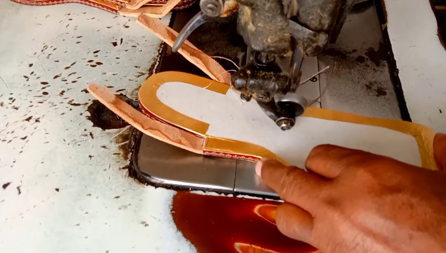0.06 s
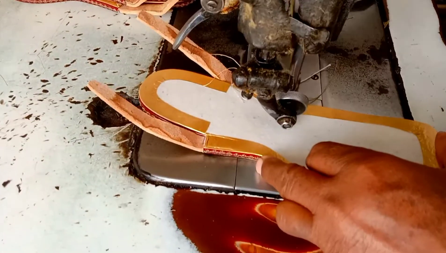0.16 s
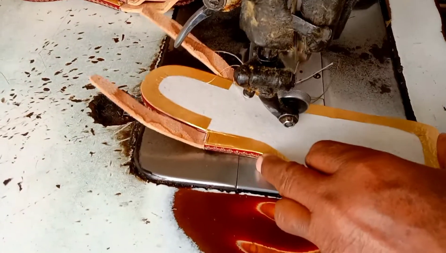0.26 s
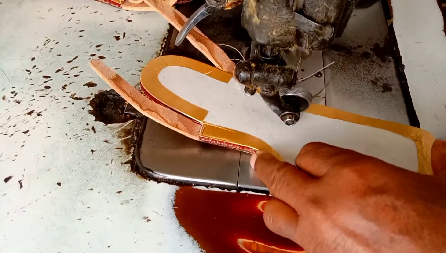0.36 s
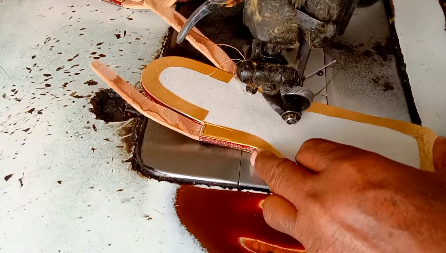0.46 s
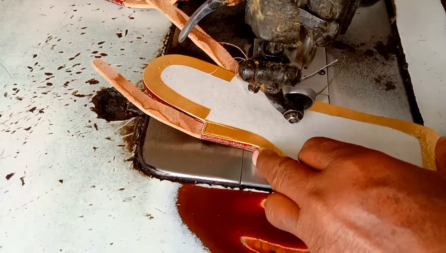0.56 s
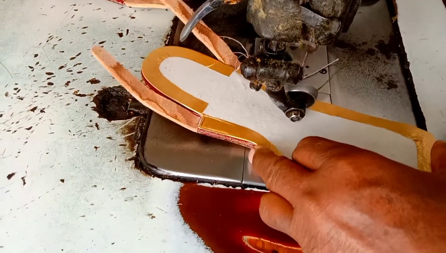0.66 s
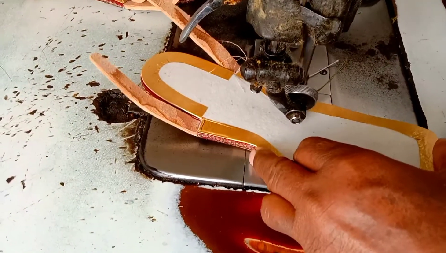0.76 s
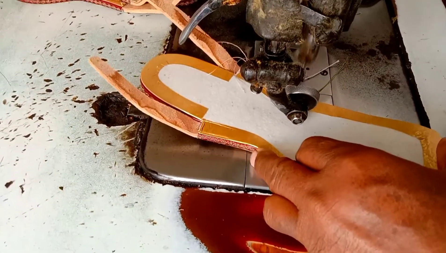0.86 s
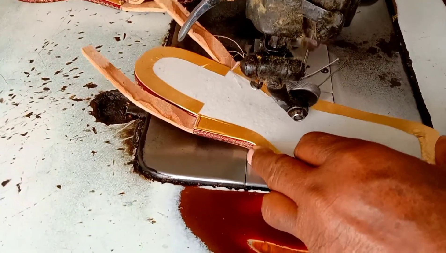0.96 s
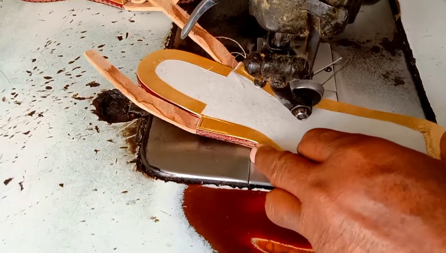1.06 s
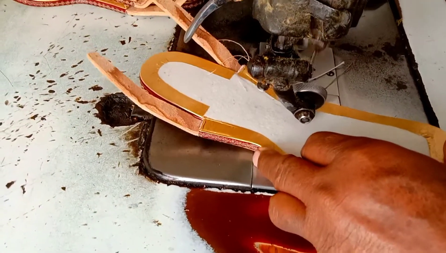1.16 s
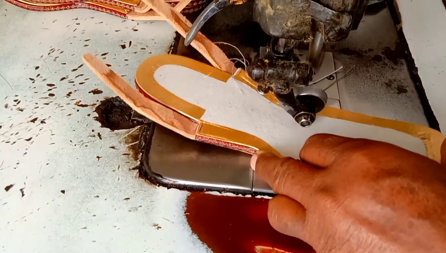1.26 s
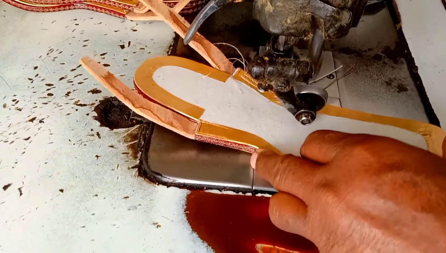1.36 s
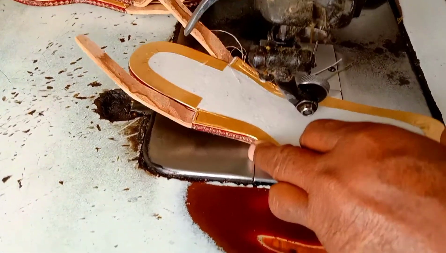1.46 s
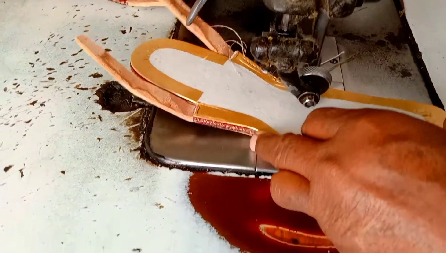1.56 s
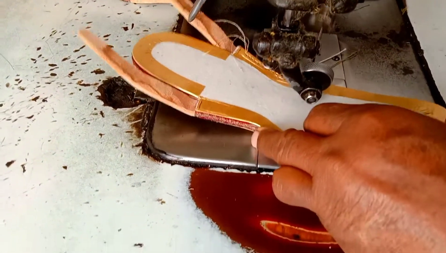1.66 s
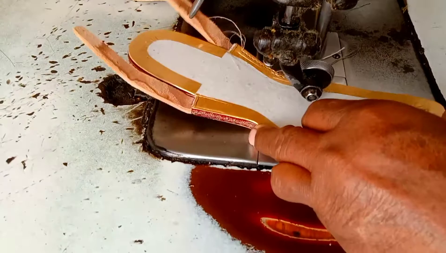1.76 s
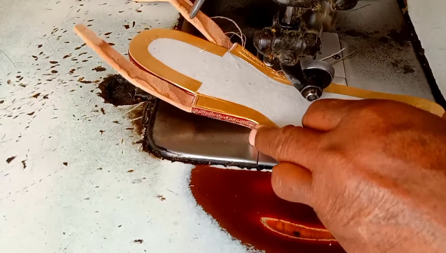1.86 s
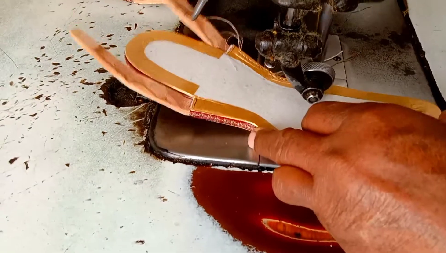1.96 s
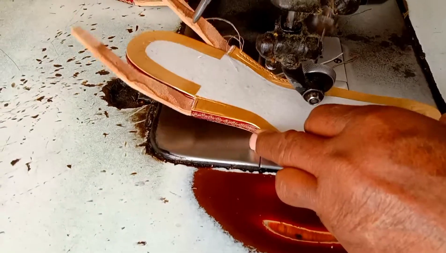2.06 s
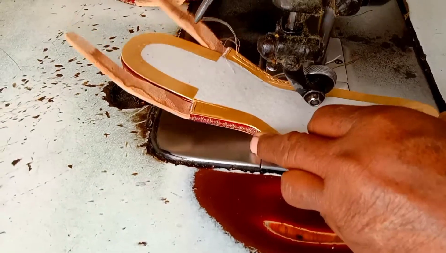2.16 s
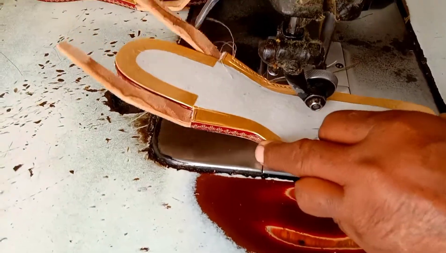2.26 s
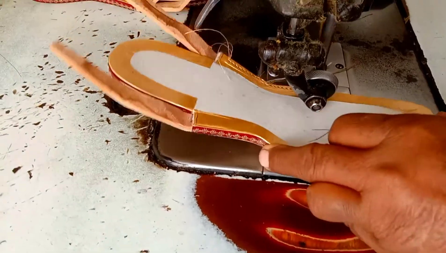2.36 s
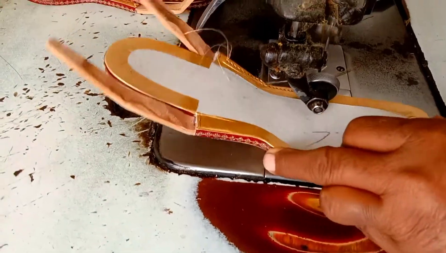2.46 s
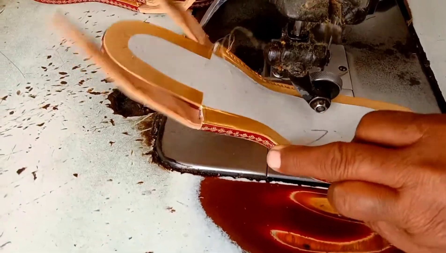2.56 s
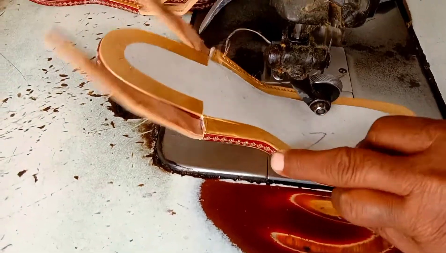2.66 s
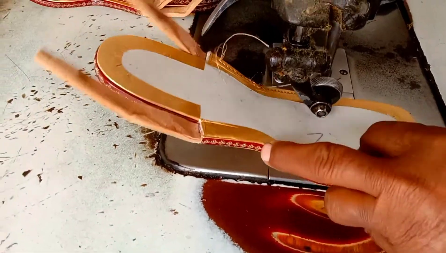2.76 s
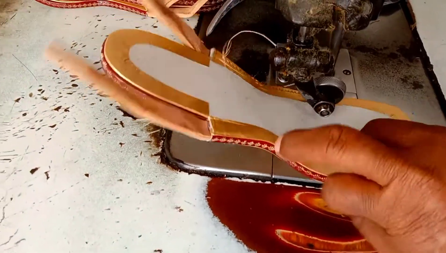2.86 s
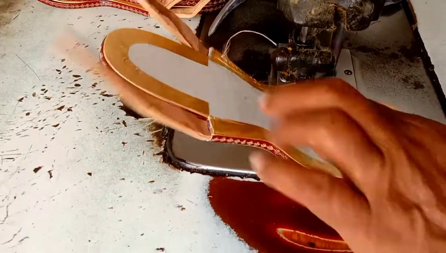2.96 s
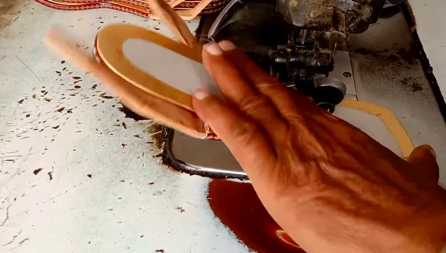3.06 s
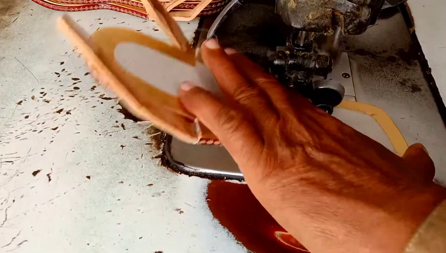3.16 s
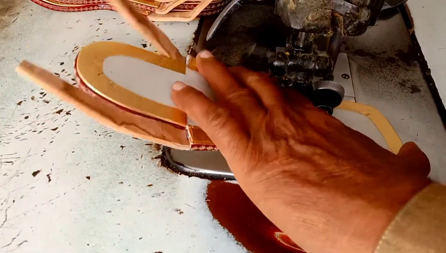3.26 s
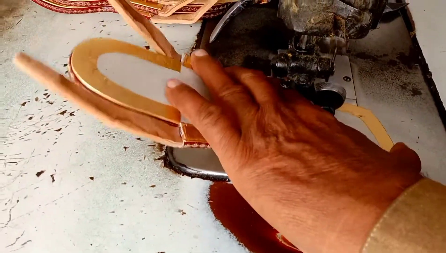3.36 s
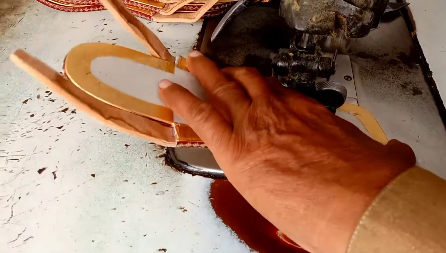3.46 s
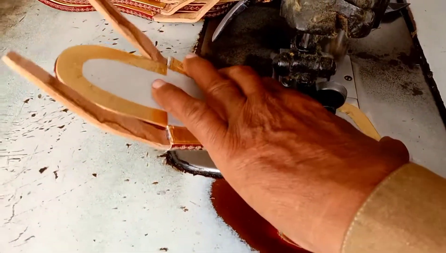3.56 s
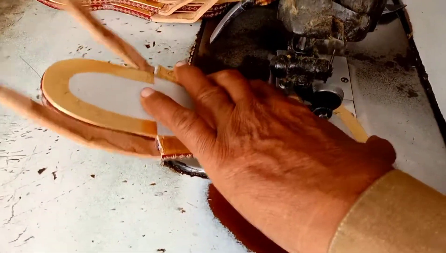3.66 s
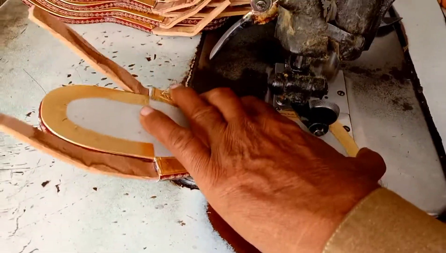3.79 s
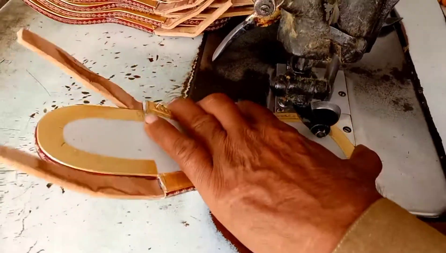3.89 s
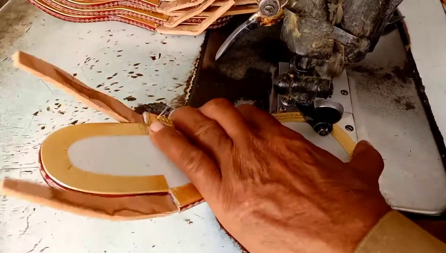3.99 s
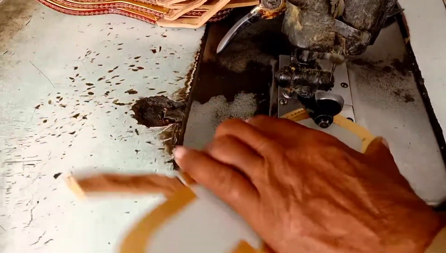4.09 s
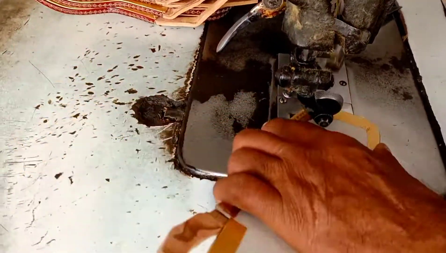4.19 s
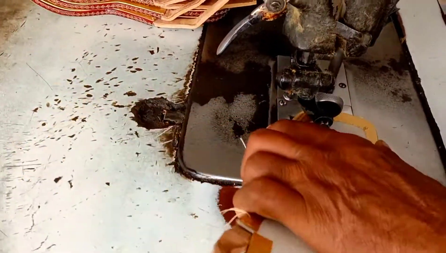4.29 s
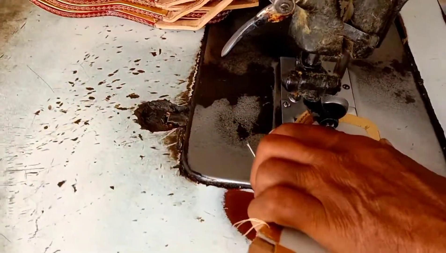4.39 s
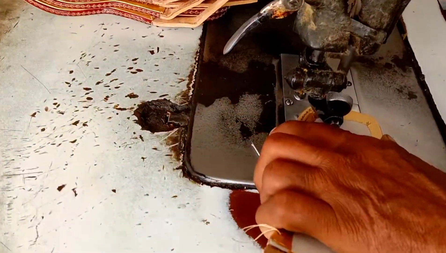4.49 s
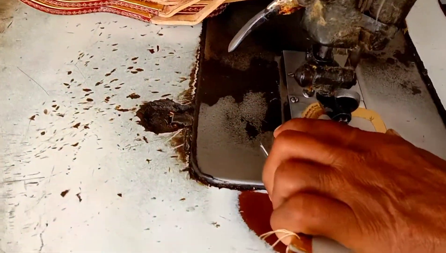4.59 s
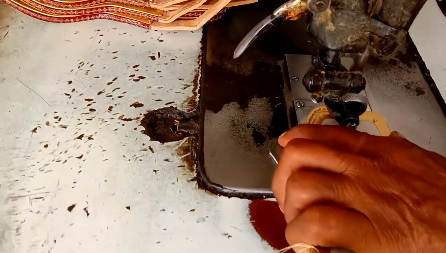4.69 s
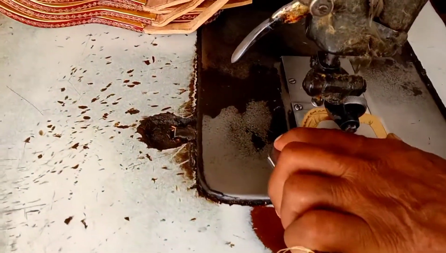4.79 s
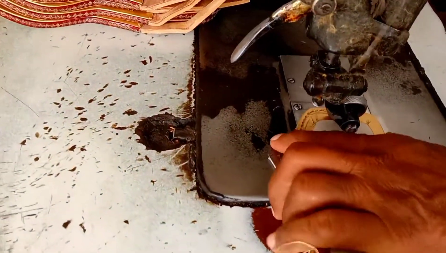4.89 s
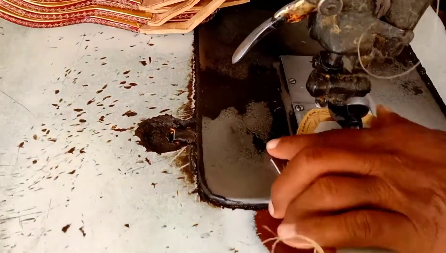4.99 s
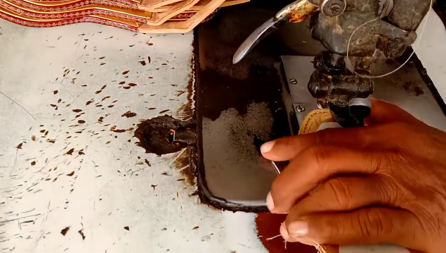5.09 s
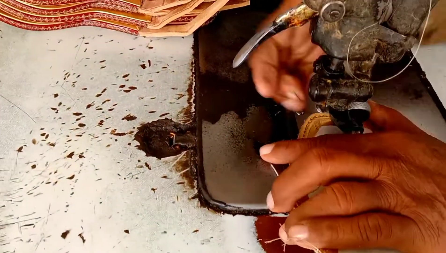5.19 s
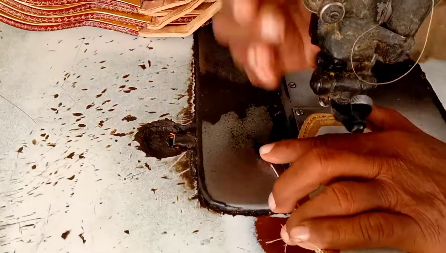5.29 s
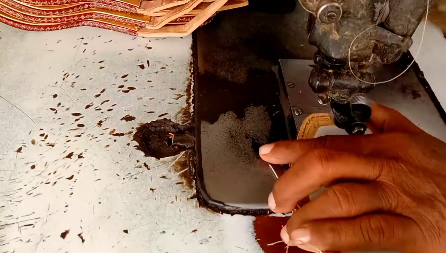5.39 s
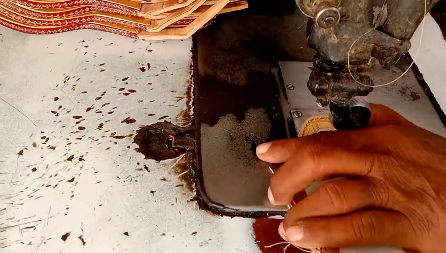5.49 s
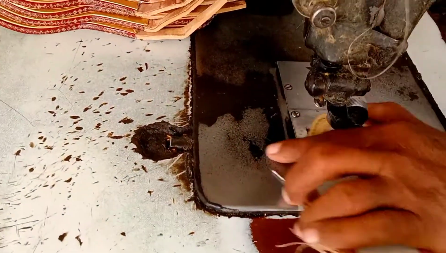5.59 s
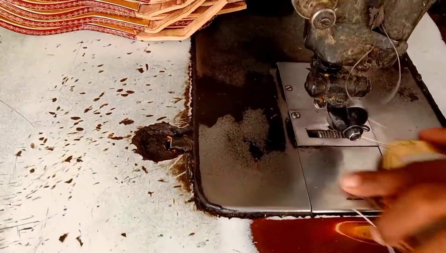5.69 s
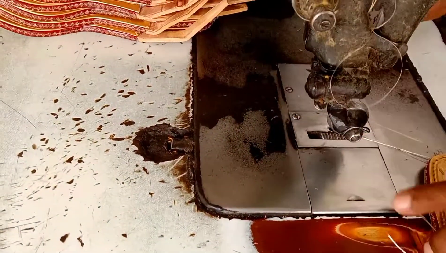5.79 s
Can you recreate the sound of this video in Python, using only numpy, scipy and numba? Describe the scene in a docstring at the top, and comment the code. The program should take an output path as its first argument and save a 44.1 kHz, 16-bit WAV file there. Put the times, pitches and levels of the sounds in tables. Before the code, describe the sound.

In a workshop, close to the microphone, an old sewing machine stitches leather. Heavy clanking strokes with low table thumps quicken, drop out for a blink, then become a fast bright rattle. It slows briefly, bursts again and stops; small metal snaps follow while the motor hums and whines.

```python
"""In a workshop, a hand's width from a phone, an old sewing machine stitches a leather sole.
Each stitch rattles the needle bar and shuttle and thumps the table; gears whirr between. It speeds up,
the sound drops out for a blink, it runs fast, then stops. The foot lever snaps three times, the sole is
dragged away, and the idling motor hums and whines on. Noisy contacts and clean pushes are
sent through band-pass filters that stand for the resonances of steel, casting and table."""
import sys
import numpy as np
from scipy import signal
from scipy.io import wavfile
from scipy.ndimage import uniform_filter1d
from numba import njit

SR = 44100
rng = np.random.default_rng(int(sys.argv[2]) if len(sys.argv) > 2 else 0)


def to_wav(sig):
    """Store sig (one row per channel, or 1-D mono) as 16-bit WAV at the path in sys.argv[1].

    Samples outside -1..1 are clipped; the rate is SR.
    """
    pcm = np.clip(np.atleast_2d(sig), -1, 1) * 32767
    pcm = np.round(pcm).astype(np.int16)
    wavfile.write(sys.argv[1], SR, pcm.T)  # frames by channels


N = 257544
TIME = np.arange(N) / SR  # seconds

# All levels in the tables are relative: each sound adds its own offset.
# Resonances of each part: (f/Hz, basic width/Hz, level/dB); filters widen the basic width.
# Small steel parts, from low to high
STEEL_MODES = [(2153, 740, -4), (2810, 490, -4.5), (3444, 190, -0.5), (5073, 540, 6), (5522, 500, 4.5),
               (5825, 1020, 2.5), (6420, 210, -9)]
# Iron casting of the machine: (f/Hz, basic width/Hz, level/dB)
CASTING_MODES = [(594, 560, 2.5), (826, 142, 3), (976, 160, 6), (1108, 230, 1.5), (1350, 353, 3.5),
                 (1630, 1500, -8.5)]
# Table under the machine: (f/Hz, basic width/Hz, level/dB)
TABLE_MODES = [(145.5, 33, -8.5), (182.7, 35.7, 0), (214.6, 36.8, 0), (295.3, 40.2, 3), (345.6, 96, -4.5),
               (420, 300, -15.5)]
# Deepest resonances of the table: (f/Hz, basic width/Hz, level/dB)
DEEP_MODES = [(75.5, 39, -17), (115.3, 32, 12.5)]
# Highest sizzle of the steel: (f/Hz, basic width/Hz, level/dB)
SIZZLE_MODES = [(10150, 910, 1), (11800, 7000, 24.5), (15000, 1800, 5)]
# Humming of the motor: (f/Hz, basic width/Hz, level/dB)
HUM_MODES = [(151, 67, -11.5), (289.3, 11.1, 7.5), (341.2, 15, 0.5), (586, 13.5, -15), (726, 117, -10.5),
             (1371, 87, -7), (1500, 420, -16.5)]
# Whining of the motor: (f/Hz, basic width/Hz, level/dB)
WHINE_MODES = [(5260, 110, -19), (6390, 170, 5.5), (10200, 610, -21.5)]

# Running gear between the blows: (t/s, gear chatter level/dB, frame shaking level/dB)
GEAR_LEVELS = [(0, -36, -32), (.2, -29, -35.5), (.95, -26.5, -29.5), (1.87, -26, -36), (2.2, -26, -34.5),
               (3.68, -21, -33), (4.1, -22, -24), (4.15, -29, -57), (4.19, -34, -38), (4.26, -29.5, -35),
               (4.5, -23.5, -29.5), (4.7, -19.5, -27.5), (4.87, -40, -38), (4.9, -45, -72)]
# Motor idling with the needle at rest: (t/s, hum level/dB, whine level/dB, hiss level/dB)
IDLE_LEVELS = [(4.871, -39, -52, -52), (4.95, -42, -64, -41.5), (5.07, -37, -40, -37),
               (5.15, -36, -33, -36), (5.33, -32, -30, -34), (5.6, -36, -32.5, -32.5),
               (5.69, -33.5, -20.5, -32), (5.84, -35.5, -36.5, -37)]
# One row per stitch, timed at the shuttle's rattle:
# (t/s, rattle level/dB, needle bar knock level/dB, table thump level/dB, thump delay/s)
STITCH_BLOWS = [(-0.09, -13, -12, -9, .094), (0.2785, -5.5, -7, -4, .098), (0.592, -10.5, -9.5, -7, .086),
                (0.8914, 0, -7.5, -4.5, .088), (1.1657, 2, -7.5, -7.5, .076), (1.4087, -2, -8, -8, .069),
                (1.6323, -2, -5.5, -11.5, .068), (1.8349, -9.5, -18, -14, .068),
                (2.0316, -1, -8.5, -12.5, .057), (2.225, -11, -17, -20, .036),
                (2.307, -2.5, -30, -15, .023), (2.4044, -16, -9, -13.5, .018),
                (2.475, -3, -11, -10.5, .024), (2.5544, -2, -14.5, -11.5, .032),
                (2.656, -10, -10, -17.5, .023), (2.7351, -2, -22, -24, .039), (2.822, 1, -21, -21.5, .028),
                (2.9054, -2.5, -11, -15.5, .035), (2.991, 6, -20, -19.5, .03),
                (3.0696, -1, -12.5, -22, .03), (3.146, -2, -8.5, -24.5, .019),
                (3.2197, -9.5, -10, -25, .014), (3.2869, -2, -10.5, -22, .016), (3.349, -1.5, -8, -23, .02),
                (3.408, 3.5, -13, -27, .023), (3.478, 4.5, -10.5, -21, .025), (3.542, -0.5, -13, -27, .025),
                (3.6, -3.5, -7, -28, .022), (3.6694, -1.5, -13, -20, .03), (3.7344, 5.5, -13, -24, .03),
                (3.8024, 1.5, -17.5, -22, .017), (3.877, 1.5, -19, -23.5, .029),
                (3.9634, -3, -36, -18.5, .021), (4.0567, -5, -27, -17.5, .047),
                (4.2196, -7, -16.5, -9, .037), (4.3534, -4, -5.5, -8.5, .015), (4.4461, -1, -11, -8, .024),
                (4.545, 0, -10, -14, .013), (4.6304, -3, -8, -12, .026), (4.7107, -3, -22, -14.5, .034),
                (4.8266, -5, -8.5, -35, .02)]
# Loose blows between stitches and snaps of the foot lever:
# (t/s, steel level/dB, casting level/dB, table level/dB, basic dying time/s)
LOOSE_BLOWS = [(0.228, -12, -23, -9, 0.24), (0.848, -13, -22, -13, .2), (1.1295, -21, -18, -23, .15),
               (1.326, -11, -37, -19, 0.21), (1.7607, -11, -18, -16.5, .2), (1.9607, -10, -18, -17, .2),
               (4.173, -35, -46, -13, 0.23), (4.2948, -14, -7.5, -21, .05), (4.4012, -10, -6, -25, 0.063),
               (4.4803, -3.5, -25, -14, .06), (4.501, -14, -9.5, -24, .05), (4.794, -7.5, -17.5, -23, .15),
               (4.8644, -24, -29, -37, 0.15), (5.0812, -9.5, -39, -51, .13), (5.215, -11, -26, -49, 0.14),
               (5.3058, -11, -23.5, -25, 0.15)]
# Hard clicks of steel on steel, as slack in the shuttle drive is taken up: (t/s, level/dB)
CLICK_PEAKS = [(0.281, -1), (0.592, -3), (0.891, -5), (1.4072, 3), (1.5965, 3), (1.8055, -4), (1.8344, 2),
               (1.9999, 4), (2.032, -1), (2.225, -2), (2.737, -0.5), (2.8877, -5), (3.0617, -5),
               (3.1263, -7), (3.1972, -13), (3.964, -1), (4.2207, 0.5), (4.295, -16), (4.335, -9),
               (4.4027, -12), (4.4772, -2), (4.7103, -1), (5.081, -19)]
# The sole is dragged off the bed plate: (t/s, level/dB, dying time/s)
DRAG_RUBS = [(5.33, -39, 0.79), (5.64, -35.5, .35)]
# Hollow in the phone's response: (f/Hz, width/Hz, share removed)
PHONE_HOLLOW = 8100, 4500, 0.68
# Blink of silence: (t/s when the sound is about to go, t/s when it starts to return)
DROPOUT = 2.1258, 2.1815

# The needle bar knocks before the rattle: this many seconds plus a share of the stitch
KNOCK_LEAD_S, KNOCK_LEAD_SHARE = 0.012, 0.08
# Basic dying time (to -60 dB): seconds plus a share of the stitch
RATTLE_T60_S, RATTLE_T60_SHARE = 0.031, 0.58
KNOCK_T60_S, KNOCK_T60_SHARE = 0.065, 0.53
THUMP_T60_S, THUMP_T60_SHARE = 0.1, 0.74
HARD_SHORTER = 0.56  # a harder rattle dies sooner: dB off the dying time per dB of level
# Casting compared with steel, and deepest resonances compared with the table, before offsets
RATTLE_CASTING_DB, KNOCK_CASTING_DB, THUMP_DEPTH_DB = -15, -6, -23
SETTLE_POWER = 1.29  # above 1, a blow holds a moment and then falls away quickly
# The needle breaks through after the shudder starts; the table bounces once
PUNCH_S, BOUNCE_S, BOUNCE_DB = 0.006, 0.012, -6
TOP_HZ = 15500  # upper limit of the phone's sound


def undb(db):
    """Turn decibels into an amplitude factor."""
    return 10 ** (np.asarray(db) / 20)


@njit
def svf(x, hz, width):
    """State-variable band-pass: one resonance, gain 1 at its centre."""
    y, band, low = np.empty(len(x)), 0.0, 0.0
    g, k = np.tan(np.pi * hz / SR), width / hz
    for i in range(len(x)):
        v = (band + g * (x[i] - low)) / (1 + g * (g + k))
        band, low = 2 * v - band, low + 2 * g * v
        y[i] = k * v
    return y


def resonate(x, hz, first_width, second_width):
    """Two band-passes in a row make a resonance with steeper sides."""
    return svf(svf(x, 1.0 * hz, 1.0 * first_width), 1.0 * hz, 1.0 * second_width)


def uneven(spread_db, ms):
    """A random level that holds for a moment, then glides to the next."""
    hold = max(int(ms * SR / 1000), 1)
    steps = undb(spread_db * rng.standard_normal(N // hold + 1))
    return uniform_filter1d(np.repeat(steps, hold)[:N], hold // 2 + 1)


def ring(envelope, modes, grain_db, grain_ms, drift_db=3.5, drift_ms=18.0, steep=1.6):
    """Small uneven contacts sound a body; as they wander, each resonance is favoured at other moments."""
    contacts = uneven(grain_db, grain_ms) * rng.standard_normal(N)
    reach = [uneven(drift_db, drift_ms) for _ in modes]

    def body(x):
        total = np.zeros(N)
        for favour, (hz, width, db) in zip(reach, modes):
            total += undb(db) * resonate(favour * x, hz, steep * width, steep * width)
        return total

    # the tiny constant keeps the filters away from exact zero
    return body(envelope * contacts + 1e-18) / np.std(body(contacts))


def strike(s, db, modes, damping):
    """A single clean push at each moment lets the resonances ring freely."""
    push = np.full(N, 1e-18)
    heard = s > 0
    push[(s[heard] * SR).astype(int)] = undb(db[heard])
    return sum(undb(level) * resonate(push, hz, damping * width, 2.6 * width)
               for hz, width, level in modes)


def blows(s, db, t60, build_ms):
    """Envelope of a row of blows: friction builds up, then loose parts settle; powers add."""
    power = np.zeros(N)
    for peak, level_db, dying in zip(s, db, t60):
        span = slice(max(int((peak - 0.06) * SR), 0), int((peak + 0.45) * SR))
        t = TIME[span] - peak
        before = np.exp(2000 * np.minimum(t, 0) / build_ms)
        # -120 here means 60 dB down, because these are powers
        after = undb(-120 * (np.abs(t) / max(dying, 0.01)) ** SETTLE_POWER)
        power[span] += undb(2 * level_db) * np.where(t < 0, before, after)
    return np.sqrt(power)


def stitches():
    """Stitch times, how long each lasts (the shorter gap to a neighbour), and the other columns."""
    s, *columns = np.transpose(STITCH_BLOWS)
    gap = np.diff(s)
    length = np.minimum(np.r_[gap[0], gap], np.r_[gap, gap[-1]])
    return s, length, *columns


def whirr():
    """Gears and belt keep every part of the machine trembling."""
    s, *columns = np.transpose(GEAR_LEVELS)
    gear, frame = (undb(np.interp(TIME, s, c, right=-90)) for c in columns)
    chatter = ring(gear, STEEL_MODES[3:], 1.4, 1.4)
    chatter += undb(-5) * ring(frame, STEEL_MODES[:3], 3.0, 4.6)
    chatter += undb(-16) * ring(gear, SIZZLE_MODES, 1.1, 4.8)
    shaking = ring(frame, CASTING_MODES, 2.1, 3.4)
    shaking += undb(4.5) * ring(frame, TABLE_MODES, 2.3, 6.7)
    shaking += undb(-13) * ring(frame, DEEP_MODES, 2.3, 13.0)
    return chatter + shaking


def motor():
    """The motor hums throughout; its wavering whine and hiss stand out once the needle rests."""
    s, hum_db, whine_db, hiss_db = np.transpose(IDLE_LEVELS)
    hum_level = undb(np.interp(TIME, s, hum_db, left=-29))
    whine_level = undb(np.interp(TIME, s, whine_db, left=-90))
    hiss_level = undb(np.interp(TIME, s, hiss_db, left=-90))
    hum = ring(hum_level, HUM_MODES, 1.5, 25.0, drift_db=2.5, drift_ms=45.0, steep=1.32)
    whine = ring(whine_level, WHINE_MODES, 0.8, 15.0, drift_db=3.8)
    hiss = ring(hiss_level, STEEL_MODES[3:], 2.0, 3.3)
    hiss += undb(-18) * ring(hiss_level, STEEL_MODES[:3] + SIZZLE_MODES, 4.0, 15.0)
    return hum + whine + hiss


def rattles():
    """Each blow knocks the casting, then small steel parts rattle and sizzle."""
    at, length, rattle_db, bar_db, _, _ = stitches()
    loose, loose_steel_db, loose_cast_db, _, loose_t60 = np.transpose(LOOSE_BLOWS)
    bar_at = at - KNOCK_LEAD_S - KNOCK_LEAD_SHARE * length
    rattle_t60 = (RATTLE_T60_S + RATTLE_T60_SHARE * length) * undb(-HARD_SHORTER * rattle_db)
    bar_t60 = KNOCK_T60_S + KNOCK_T60_SHARE * length

    # join shuttle rattles, needle bar knocks and loose blows into one row
    s = np.r_[at, bar_at, loose]
    steel_db = np.r_[rattle_db, bar_db, loose_steel_db]
    cast_db = np.r_[rattle_db + RATTLE_CASTING_DB, bar_db + KNOCK_CASTING_DB, loose_cast_db]
    t60 = np.r_[rattle_t60, bar_t60, loose_t60]

    steel = ring(blows(s, steel_db - 8.0, t60, 1.86), STEEL_MODES, 2.6, 0.85)
    knock = strike(s, cast_db + 13.5, CASTING_MODES, 2.4)
    knock += ring(blows(s, cast_db - 2.5, 0.68 * t60, 2.9), CASTING_MODES, 2.74, 1.4)
    sizzle = ring(blows(s, steel_db - 22, 0.7 * t60, 2.1), SIZZLE_MODES, 3.7, 0.94)
    return steel + knock + sizzle


def thumps():
    """A push rings the table and its deepest modes; it shudders on and the casting knocks along."""
    at, length, _, _, db, lag = stitches()
    s, deep_db = at + lag, db + THUMP_DEPTH_DB
    t60 = THUMP_T60_S + THUMP_T60_SHARE * length

    # each hit is followed by one bounce
    hit = np.r_[s + PUNCH_S, s + PUNCH_S + BOUNCE_S]
    hit_db = np.r_[db, db + BOUNCE_DB]
    push = strike(hit, hit_db + 41, TABLE_MODES, 1.43)
    push += strike(s, deep_db + 56, DEEP_MODES, 0.8)
    push += strike(hit, hit_db + 13, CASTING_MODES, 1.5)

    shudder = ring(blows(s, db - 8.5, t60, 5.0), TABLE_MODES, 2.1, 3.0, drift_db=2.5)
    shudder += ring(blows(s, deep_db + 2.5, 1.1 * t60, 2.5), DEEP_MODES, 2.5, 6.0)
    knock = ring(blows(s, db - 15.5, 1.7 * t60, 3.1), CASTING_MODES, 4.7, 1.5)

    # loose blows reach only the upper modes of the table
    loose, _, _, table_db, loose_t60 = np.transpose(LOOSE_BLOWS)
    loose_level = blows(loose, table_db - 5, 1.24 * loose_t60, 2.5)
    upper = ring(loose_level, TABLE_MODES[3:], 1.6, 8.0, drift_db=2.0)
    return push + shudder + upper + knock


def clicks():
    """Steel meets steel: a clean tick and a few milliseconds of bounce."""
    s, db = np.transpose(CLICK_PEAKS)
    tick = strike(s, db + 11, STEEL_MODES, 1.9) + strike(s, db - 16, SIZZLE_MODES, 1.9)
    bounce = ring(blows(s, db - 7, np.full(len(s), 0.025), 0.2), STEEL_MODES, 3.1, 0.95)
    return tick + bounce


def drags():
    """Leather rubs over the plate and sounds the casting and the lower steel resonances."""
    rub = blows(*np.transpose(DRAG_RUBS), 30.0)
    casting = ring(rub, CASTING_MODES[2:], 2.8, 6.0)
    return casting + undb(-5.5) * ring(rub, STEEL_MODES[:3], 2.5, 4.1)


def scene():
    """Add all the sounds of the machine into one channel."""
    return (whirr() + motor() + rattles() + thumps() + clicks() + drags())[None]


def record(dry):
    """The phone dulls a treble band, holds loud moments down, drops out for a blink and cuts the top."""
    hz, width, share = PHONE_HOLLOW
    sound = dry - share * svf(dry[0], 1.0 * hz, 1.0 * width)

    # gain control: where the level over 12 ms around a moment passes a knee, it is squeezed
    loudness = np.sqrt(uniform_filter1d(sound ** 2, int(0.012 * SR)) + 1e-12)
    sound = sound * np.minimum(undb(-15.5) / loudness, 1) ** 0.15
    sound = np.tanh(sound) / 1.243  # round off the peaks

    # the sound goes in half a millisecond and returns over about three
    stop, start = DROPOUT
    gate = np.clip(np.maximum((stop - TIME) * 2000, (TIME - start) * 300), 0, 1)
    low_pass = signal.ellip(9, 0.2, 60, TOP_HZ, fs=SR, output="sos")
    return signal.sosfilt(low_pass, sound * gate)


dry = scene()
out = record(dry)
to_wav(out)
```